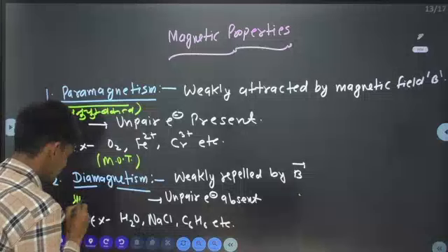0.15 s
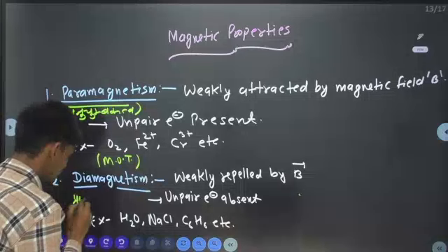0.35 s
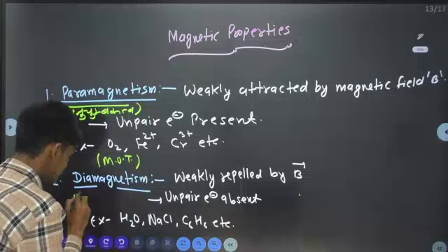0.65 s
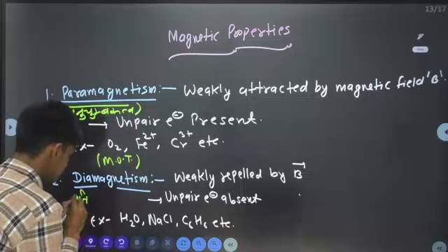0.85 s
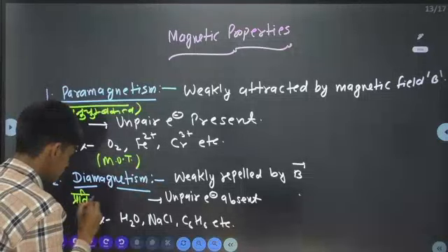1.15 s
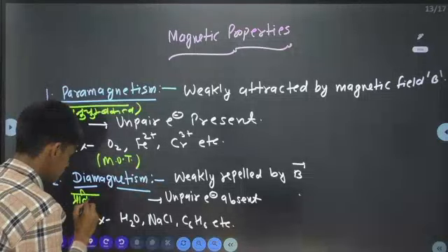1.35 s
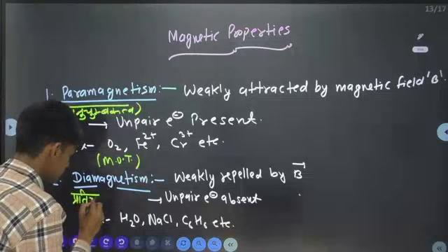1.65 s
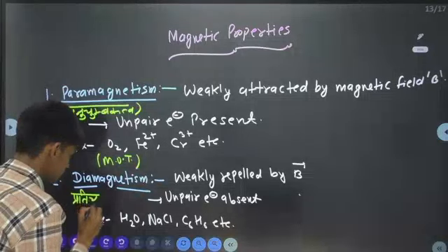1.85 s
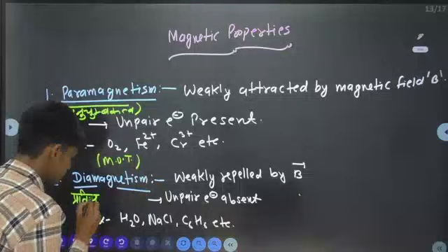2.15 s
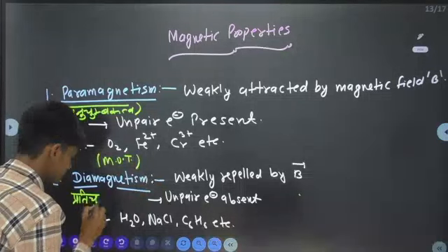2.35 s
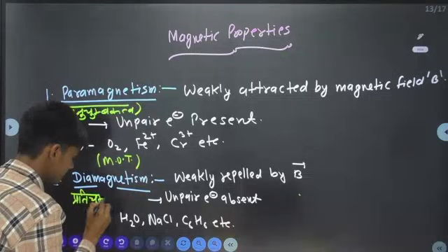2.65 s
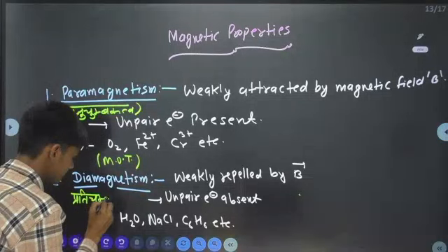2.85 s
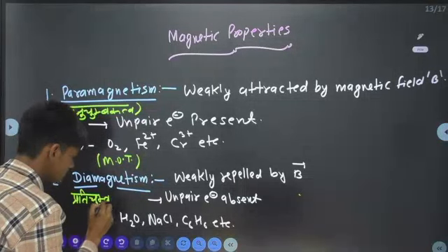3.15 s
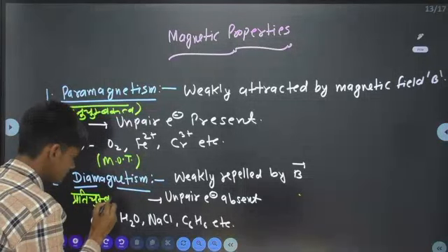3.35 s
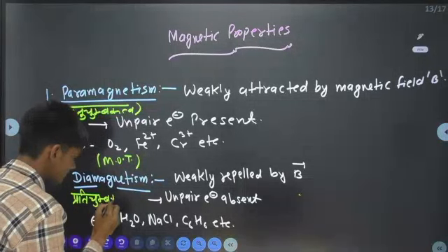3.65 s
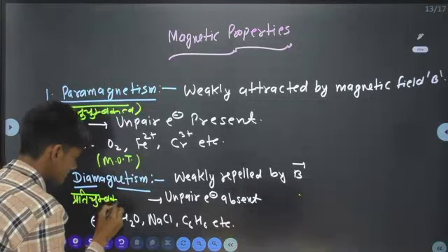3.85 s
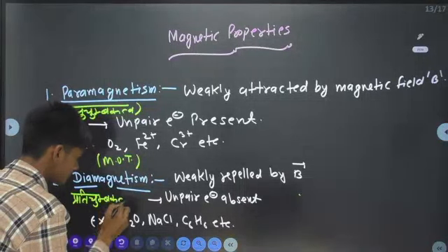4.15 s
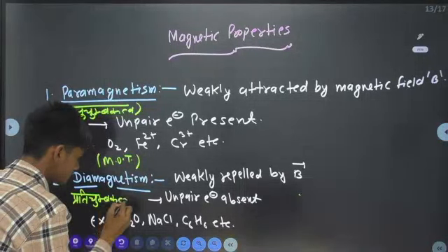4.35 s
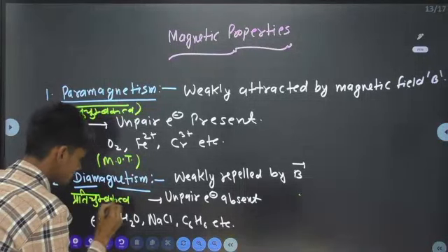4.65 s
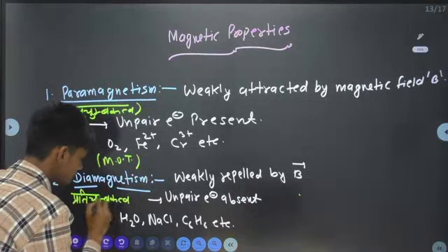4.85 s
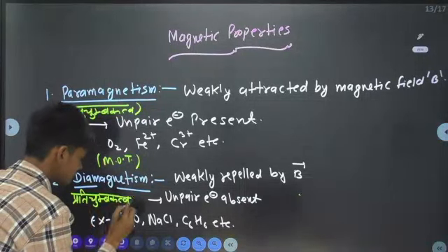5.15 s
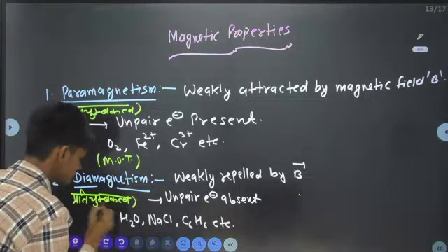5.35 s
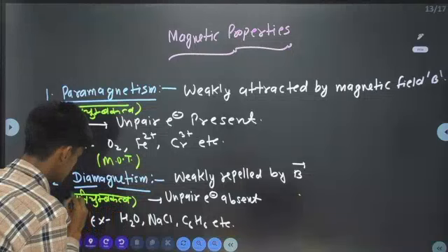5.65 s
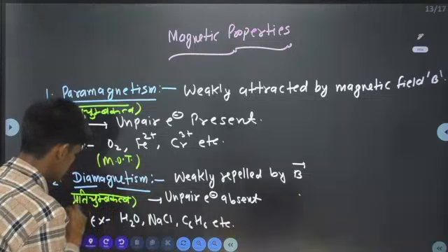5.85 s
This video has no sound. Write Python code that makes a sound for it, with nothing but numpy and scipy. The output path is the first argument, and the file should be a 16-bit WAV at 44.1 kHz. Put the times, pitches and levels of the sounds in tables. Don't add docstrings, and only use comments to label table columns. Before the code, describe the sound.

Close-miked handwriting on a big touch panel: hollow knocks, stronger at first and softer later, separated by short gaps of faint scratchy sliding. Every touch rings the glass and leaves a short dull reverberation in the room. Air handling rumbles low, with a barely audible electronic whine. Late on, a faint far-off motor hums, a tiny squeak passes, and light clicks of hand and stylus precede a final tap.

```python
import sys
import numpy as np
from scipy import signal
from scipy.io import wavfile
from scipy.ndimage import map_coordinates

SR = 44100
rng = np.random.default_rng(int(sys.argv[2]) if len(sys.argv) > 2 else 0)


def transcribe(u):
    v = np.clip(np.atleast_2d(u).T, -1, 1)
    q = np.round(v * 32767).astype(np.int16)
    wavfile.write(sys.argv[1], SR, q)


def how_loud(loudness_db):
    steps = np.asarray(loudness_db, float) / 20
    return 10 ** steps


N = 265658

# t/s, rumble level/dB
RUMBLE = [(0.0, -45.5), (0.37, -49.5), (1.84, -60), (2.25, -52.5), (2.97, -59.5), (3.14, -55.5),
          (3.66, -58.5), (4.09, -53.5), (4.31, -58), (6.02, -54.5)]
# f/Hz, level per Hz/dB
AIR = [(12, -32), (20, 21), (58, 18), (117, -12.5), (160, -6), (224, -16.5), (305, -6), (599, -22.5),
       (1020, -21), (1140, -24.5), (2060, -29), (2660, -35), (13200, -42), (15200, -39), (16500, -39)]
# f/Hz, level/dB
WHINES = [(14826, -97), (15127, -96), (15579, -97)]
# t/s, f/Hz, level/dB
SWITCHED_WHINE = (4.81, 6002, -86)
# start t/s, end t/s, friction level/dB, lower ring/dB, upper ring/dB
LIFTS = [(-0.03, 0.048, -72, 2.2, -5), (0.215, 0.279, -65, -9, -4), (0.51, 0.559, -70, -8, -5),
         (0.785, 0.921, -66.5, -1.2, -2), (1.83, 1.898, -76.5, 5, -3), (2.255, 2.324, -71.5, 4, 0),
         (2.745, 2.796, -68, -5, 2.2), (3.565, 3.614, -69, -8, -0.5), (3.795, 3.894, -72, -0.1, 3),
         (4.282, 4.338, -68.5, -2, -2), (4.69, 4.824, -69, -0.5, 0), (4.988, 5.074, -71.5, -4, 1),
         (5.615, 5.704, -69, -3, 3.5)]
TURNS = [(0.425, 0.54, -65, -2, -8), (1.235, 1.325, -69.5, -1, -4), (1.33, 1.398, -77.5, 6, -6),
         (1.398, 1.51, -67.5, 2.8, -5), (1.47, 1.56, -71, -5, -2), (1.564, 1.695, -66.5, -4, -3),
         (1.705, 1.758, -71, -6, -5), (1.768, 1.865, -67, -2, -3.5), (2.07, 2.2, -68.5, -9, -1),
         (2.2, 2.275, -69, -2, -2.2), (2.45, 2.565, -69.5, 2, -1), (2.545, 2.63, -70.5, -4, -3),
         (2.59, 2.73, -73.5, 5, 2), (2.958, 3.0, -81, -3, 8), (3.165, 3.235, -72, -7, -2),
         (3.215, 3.285, -70.5, -6, 4), (3.296, 3.405, -74.5, 3, 5.5), (3.43, 3.585, -72, 5, 3.5),
         (4.015, 4.07, -72, -4, 1), (4.07, 4.27, -69.5, 1, 2.5)]
# f/Hz, width/Hz, level/dB
STYLUS = [(3850, 800, -12), (5600, 600, 0), (6500, 750, 0), (7900, 1400, -3), (9400, 600, -8),
          (10200, 850, 0), (11200, 900, -9), (14000, 2800, -7)]
# f/Hz, level/dB, time to fall 60 dB/s
PANE = [(163, -19.5, 0.51), (181, -30.5, 1), (244.7, -26.5, 0.7), (280, -36, 0.11), (305.4, -22, 0.43),
        (342.8, -25.5, 1), (373.4, -21, 0.6), (446, -27.5, 0.44), (569, -28, 0.16), (678, -32.5, 0.6),
        (734, -19.5, 0.26), (829, -19, 0.14), (942, -10.5, 0.056), (1027, -24.5, 0.21), (1083, -26, 0.067),
        (1275, -43.5, 0.099), (1280, -17, 0.16), (1530, -20, 0.037)]
# f/Hz, level/dB, time to fall 60 dB/s
ROOM = [(64.4, -45.5, 0.96), (115, -43, 0.65), (155, -33, 0.52), (346, -30.5, 0.37), (556, -33, 0.2),
        (1090, -39, 0.34), (1745, -35.5, 0.11), (2500, -57, 0.34), (4750, -59.5, 0.43),
        (9000, -54.5, 0.052)]
# t/s, push peak level/dB, echo delay/ms, pane pitch under the tip f/Hz
TAPS = [(0.2064, -7.7, 2.61, 738), (0.4294, -8.0, 2.93, 678), (0.7687, -12.2, 2.88, 678),
        (1.1922, -14.2, 2.7, 705), (2.0768, -10.3, 3.02, 673), (2.436, -14.7, 2.38, 544),
        (2.942, -14.0, 2.54, 743), (3.1544, -11.6, 3.08, 614), (3.7841, -14.5, 2.49, 501),
        (4.0188, -16.0, 2.34, 501), (4.6733, -15.5, 3.06, 619), (4.9755, -18.4, 3.08, 991),
        (5.6033, -14.0, 3.88, 791)]
# stylus tick level over push/dB, slant (0 upright - 1 flat)
LANDINGS = [(-19.5, 0.16), (-19.5, 0.031), (-20.5, 0.1), (-20.5, 0.062), (-18.5, 0.58), (-23, 0.85),
            (-21.5, 0.79), (-20, 1), (-20.5, 0.88), (-22.5, 0.87), (-20.5, 0.49), (-18.5, 0.85),
            (-13.5, .1)]
# t/s, thud peak level/dB, ring peak level/dB, ring f/Hz, ring width/Hz
KNOCKS = [(3.4249, -39, -58, 7800, 1200), (5.3972, -80, -47, 8300, 700), (5.397, -80, -47, 10600, 900),
          (5.4014, -70, -52, 8500, 1500), (5.4887, -41, -55, 4380, 250), (5.487, -55, -53, 2000, 1200),
          (5.4880, -70, -55, 9000, 1200), (5.4955, -50, -60, 4300, 500), (5.496, -70, -58, 8000, 1500),
          (5.496, -70, -60, 3100, 500), (5.5070, -51, -57, 8500, 1500), (5.5075, -70, -61, 4300, 500),
          (5.5223, -62, -60, 1500, 700)]
# t/s, f/Hz, level/dB
FAR_MOTOR = [
    (5.17, 196.7, -59),
    (5.23, 192.3, -55),
    (5.45, 198.4, -61.5),
    (5.6, 216, -70),
]
# t/s, f/Hz, level/dB
SQUEAK = [
    (5.282, 9700, -88),
    (5.295, 10200, -78),
    (5.312, 10400, -79),
    (5.325, 10100, -90),
]


def rms_one(x):
    return x / np.sqrt(np.mean(x ** 2) + 1e-20)


def peak_one(x):
    return x / np.abs(x).max()


def add(out, s, x):
    i = round(s * SR)
    out[i:i + len(x)] += x[:N - i]


def column(rows, k, hz):
    rows = np.array(rows)
    return np.interp(np.log(hz), np.log(rows[:, 0]), rows[:, k])


def by_slant(upright, flat, slant):
    return upright + (flat - upright) * slant


def high_pass(x, order, hz):
    return signal.sosfilt(signal.butter(order, hz, "high", fs=SR, output="sos"), x)


def drift(rate):
    r = np.exp(-80 * np.pi * rate / SR)
    slow = signal.lfilter([1], [1, -2 * r, r * r], rng.standard_normal(N // 40 + 2002))[2000:]
    return np.interp(np.arange(N) / 40, np.arange(len(slow)), rms_one(slow - slow.mean()))


def ring(x, hz, t60, lead=0):
    r, w = how_loud(-60 / (t60 * SR)), 2 * np.pi * hz / SR
    return signal.lfilter([np.sin(lead), r * np.sin(w - lead)], [1, -2 * r * np.cos(w), r * r], x)


def steep(x, hz, width):
    t60 = 1.4 / width
    return ring(ring(x, hz, t60), hz, t60)


def glide(rows):
    t, (s, hz, level_db) = np.arange(N) / SR, np.transpose(rows)
    level = how_loud(np.interp(t, s, level_db, left=-150, right=-150))
    return level * np.sin(2 * np.pi * np.cumsum(np.interp(t, s, hz)) / SR)


def bands():
    edges = 18 * 2 ** np.arange(0, 10.1, 1 / 3)
    white = rng.standard_normal((2, N + 8000))
    for k, (low, high) in enumerate(zip(edges, edges[1:])):
        sos = signal.butter(2, [low, high], "band", fs=SR, output="sos")
        yield np.sqrt(low * high), signal.sosfilt(sos, white[k % 2])[8000:]


def air(noise_bands):
    rumble, noise = 0, 0
    for hz, band in noise_bands:
        level_db = column(AIR, 1, hz)
        if hz < 90:
            rumble = rumble + how_loud(level_db + 0.8 * drift(3)) * band
        else:
            noise = noise + how_loud(level_db + 1.6 * drift(9.6) * (hz < 2000)) * band
    modes = sum(how_loud(column(AIR, 1, hz)) * rms_one(ring(noise, hz, 0.94 * t60)) for hz, _, t60 in PANE[:7])
    noise = rms_one(noise) + how_loud(-10.5) * rms_one(modes)
    rumble = rms_one(high_pass(rumble, 8, 36))
    s, rumble_db = np.transpose(RUMBLE)
    noise_db = -58.5
    return how_loud(np.interp(np.arange(N) / SR, s, rumble_db)) * rumble + how_loud(noise_db) * noise


def display_whines():
    t = np.arange(N) / SR
    out = sum(np.sqrt(2) * how_loud(level_db) * np.sin(2 * np.pi * hz * t) for hz, level_db in WHINES)
    on, hz, level_db = SWITCHED_WHINE
    return out + (t > on) * np.sqrt(2) * how_loud(level_db) * np.sin(2 * np.pi * hz * t)


def stylus(x, widen):
    return [(-1) ** k * how_loud(level_db) * rms_one(steep(x, hz, widen * width))
            for k, (hz, width, level_db) in enumerate(STYLUS)]


def stroke_gains():
    t, power = np.arange(N) / SR, np.zeros((4, N))
    speed_up_s, lift_s = 0.032, 0.0037
    for rows, turning in ((TURNS, True), (LIFTS, False)):
        hiss_db = -9 if turning else -1
        for start, end, friction_db, lower_db, upper_db in rows:
            if turning:
                speed = np.sin(np.pi * np.clip((t - start) / (end - start), 0, 1)) ** 0.75
            else:
                speed = np.clip((t - start) / speed_up_s, 0, 1) ** 0.52
                speed = speed * np.clip((end - t) / lift_s, 0, 1)
            group_db = np.array([[lower_db], [0], [upper_db], [hiss_db]])
            power += (speed * how_loud(friction_db + group_db)) ** 2
    return np.sqrt(power)


def strokes():
    gains = stroke_gains()
    grit = rng.standard_normal(N) * how_loud(4.2 * np.minimum(rng.exponential(1, N), 4))
    rings = [how_loud(2.8 * drift(14)) * r for r in stylus(grit, 0.65)]
    hiss = how_loud(2.5 * drift(20)) * np.diff(grit[::-1], prepend=0)
    groups = [rms_one(sum(g)) for g in (rings[:2], rings[2:4], rings[4:], [hiss])]
    out = np.zeros(N)
    for gain, group in zip(gains, groups):
        pace = np.cumsum(1 + 0.015 * drift(5))
        out += gain * map_coordinates(group, [pace], order=3, mode="mirror")
    return out


def blows(hz):
    octaves = np.log2(np.clip(hz, 150, 2500) / 500)
    earlier_tap_db = -19.5
    out = [(0.00047, earlier_tap_db - 2 * octaves)]
    for (s, push_db, _, _), (_, slant) in zip(TAPS, LANDINGS):
        out.append((s + 0.003055, push_db + by_slant(-3, -0.34, slant) + 3.5 + 0.36 * octaves))
    return out


def pane_ringing():
    out, t = np.zeros(N), np.arange(18000) / SR
    hz, level_db, t60 = np.transpose(PANE)[:, :, None]
    shape = how_loud(level_db - 8.0 - 60 * t / t60) * (1 - np.exp(-t / 0.0048))
    chance = rng.random((len(TAPS) + 1, 4, len(PANE), 1))
    for (s, blow_db), (size, phase, beat, split) in zip(blows(hz), chance):
        beating = 1 + 0.41 * np.sin(2 * np.pi * (hz * 0.0412 * (0.39 + split) * t + beat))
        strength = how_loud(blow_db + 8.4 * (size - 1.0))
        add(out, s, np.sum(strength * shape * beating * np.sin(2 * np.pi * (hz * t + phase)), axis=0))
    return out


def room_tail(noise_bands):
    out, build = 0, np.exp(-1 / (0.001 * SR))
    for hz, band in noise_bands:
        hits = np.zeros(N) + 1e-18
        for s, blow_db in blows(hz):
            hits[round(s * SR)] = how_loud(blow_db)
        decay = how_loud(-60 / (column(ROOM, 2, hz) * SR))
        fade = signal.lfilter([1 - build], np.convolve([1, -build], [1, -decay]), hits)
        out = out + how_loud(column(ROOM, 1, hz)) * rms_one(band[::-1]) * fade
    return out


def push(size):
    contact_ms = 0.98
    t = np.arange(size) / SR * 1000 / contact_ms - 0.06
    dent = -np.sin(np.pi * np.clip(t, 0, 1)) ** 2
    return high_pass(dent, 2, 121), dent / np.abs(dent).sum()


def chatter(size, chance, fade_s):
    out = np.zeros(size)
    out[:len(chance)] = chance * np.exp(-np.arange(len(chance)) / SR / fade_s)
    return out


def tick(size, chance, tick_db, slant):
    usual_tick_db = -21
    contacts = chatter(size, chance, 0.0006) + 0.1 * chatter(size, chance[::-1], 0.003)
    rings = stylus(contacts, 1.3)
    parts = rings[0], sum(rings[1:4]), sum(rings[4:7]), rings[7]
    barrel_db = by_slant(-1, -13.5, slant) + usual_tick_db - tick_db
    top_db = -18.5 + 0.6 * (tick_db - usual_tick_db)
    return sum(how_loud(d + 3) * peak_one(p) for p, d in zip(parts, (barrel_db, 0, -13, top_db)))


def local_ring(force, pane_hz, slant):
    ring_db = -8 + 9 * min(0, np.log2(pane_hz / 720))
    overtone_db, overtone_hz = by_slant(-19, -6, slant), by_slant(1350, 1270, slant)
    out = how_loud(ring_db) * ring(force, pane_hz, 0.058, lead=np.pi / 2)
    return out + how_loud(overtone_db) * ring(force, overtone_hz, 0.03, lead=np.pi / 2)


def taps():
    out, size = np.zeros(N), 3000
    swing, force = push(size)
    chances = rng.standard_normal((len(TAPS), 400))
    for (s, push_db, echo_ms, pane_hz), (tick_db, slant), chance in zip(TAPS, LANDINGS, chances):
        click = how_loud(push_db + tick_db) * tick(size, chance, tick_db, slant)
        thud = how_loud(push_db + 0.5) * swing
        add(out, s, thud + click + how_loud(push_db) * local_ring(force, pane_hz, slant))
        add(out, s + echo_ms / 1000, how_loud(-11) * thud + how_loud(-8.5) * click)
    return out


def knocks():
    out, size = np.zeros(N), 900
    swing = push(size)[0]
    chances = rng.standard_normal((len(KNOCKS), 60))
    for (s, thud_db, ring_db, hz, width), chance in zip(KNOCKS, chances):
        short_ring = peak_one(steep(chatter(size, chance, 0.0005), hz, width))
        add(out, s, how_loud(thud_db) * swing + how_loud(ring_db) * short_ring)
    return out


def far_motor():
    return how_loud(3.5) * glide(FAR_MOTOR)


def squeak():
    return glide(SQUEAK)


def scene():
    noise_bands = list(bands())
    background = air(noise_bands) + display_whines() + far_motor()
    writing = strokes() + taps() + knocks() + squeak()
    answer = pane_ringing() + room_tail(noise_bands)
    return (background + writing + answer)[None]


def band_limit(x):
    return signal.sosfilt(signal.butter(12, 16680, fs=SR, output="sos"), x)


def record(dry):
    cut = signal.sosfilt(signal.cheby2(12, 30, 15900, fs=SR, output="sos"), dry)
    return band_limit(cut)


dry = scene()
out = record(dry)
transcribe(out)
```